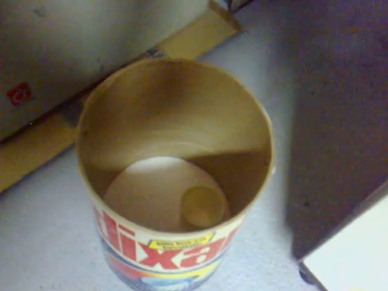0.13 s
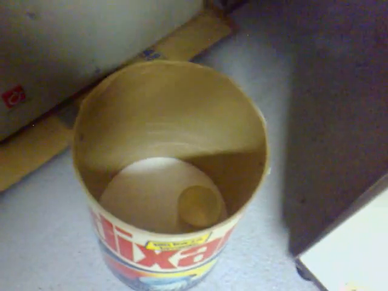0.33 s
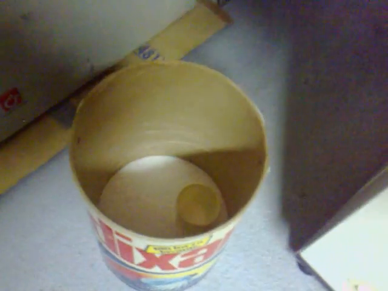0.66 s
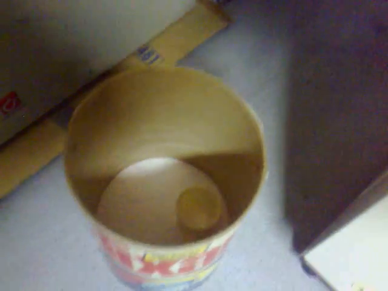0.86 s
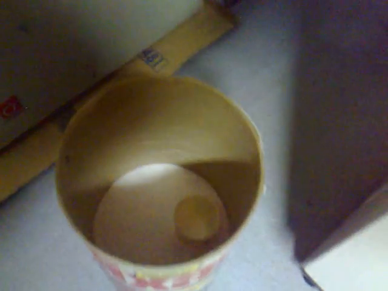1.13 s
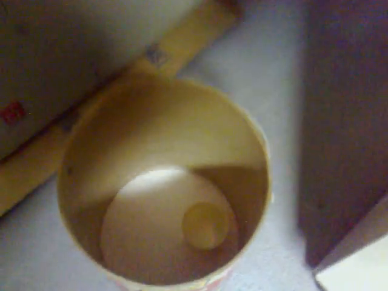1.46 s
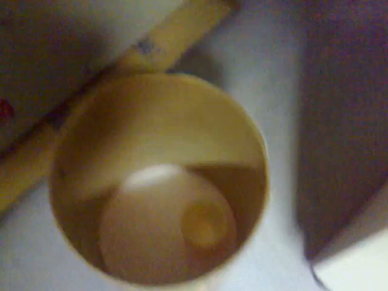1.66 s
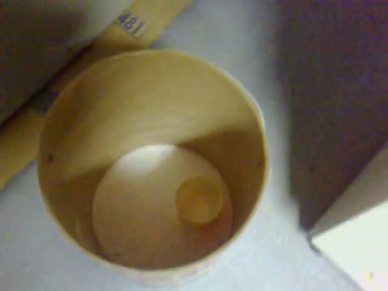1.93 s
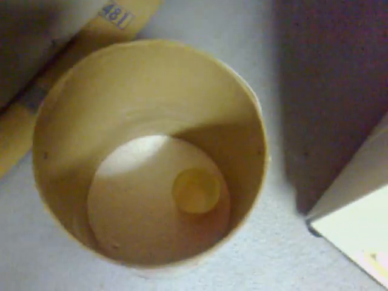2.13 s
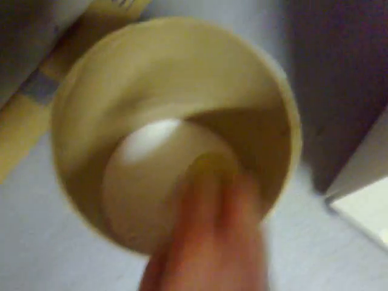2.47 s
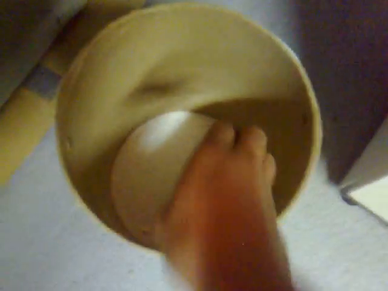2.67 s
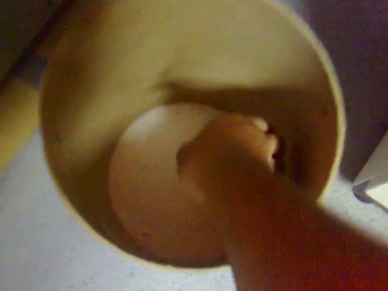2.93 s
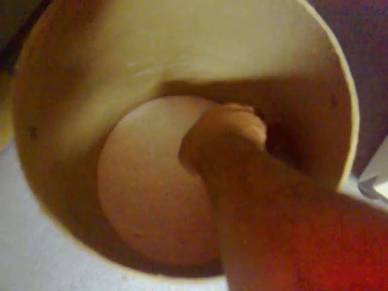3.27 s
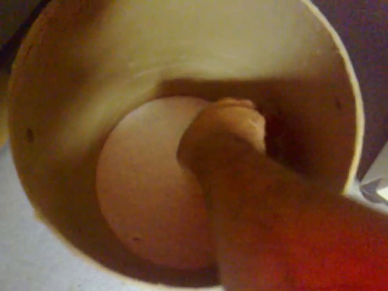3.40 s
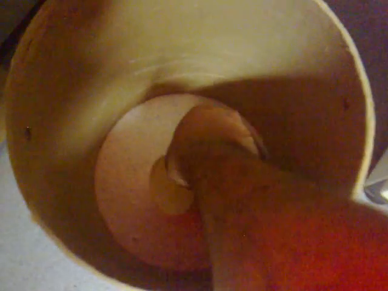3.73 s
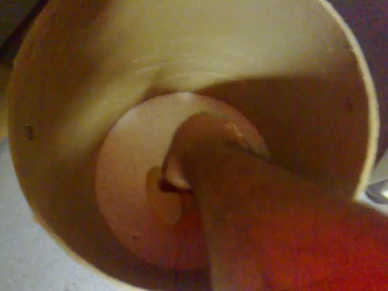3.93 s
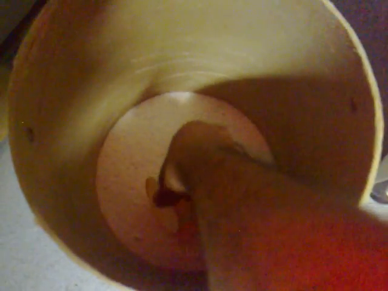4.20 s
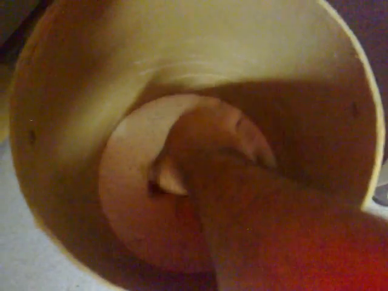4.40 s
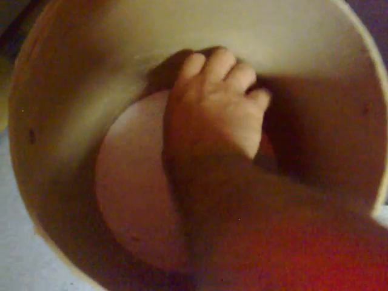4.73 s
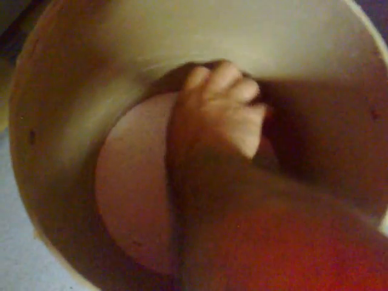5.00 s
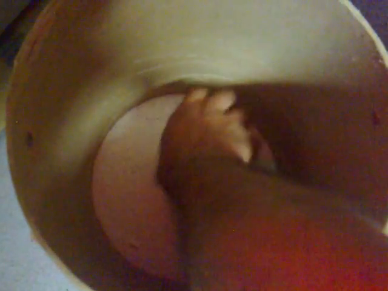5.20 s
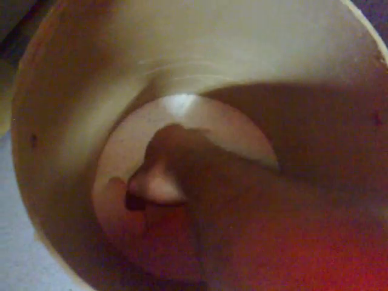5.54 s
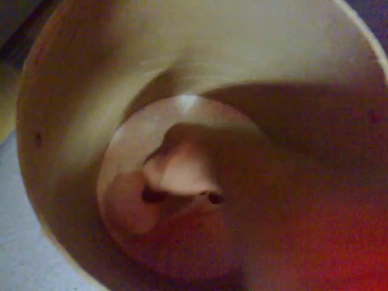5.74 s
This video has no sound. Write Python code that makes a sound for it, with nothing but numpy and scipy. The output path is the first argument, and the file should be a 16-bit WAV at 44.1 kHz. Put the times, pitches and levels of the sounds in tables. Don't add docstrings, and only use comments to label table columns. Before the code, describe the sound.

A cardboard drum's lid pops off, knocks and thuds hollowly, then a hand taps and scrapes a small cup inside, over steady recorder hiss.

```python
import sys
import numpy as np
from scipy import signal
from scipy.fft import rfft, irfft
from scipy.io import wavfile

SR = 44100
rng = np.random.default_rng(int(sys.argv[2]) if len(sys.argv) > 2 else 0)


def digitize_waveform(pressure):
    field = np.atleast_2d(pressure).T
    bounded = np.clip(field, -1, 1)
    quanta = np.round(bounded * 32767).astype(np.int16)
    wavfile.write(sys.argv[1], SR, quanta)


def volts_from_db(level):
    exponent = np.asarray(level, float) / 20
    return 10 ** exponent


N = 258867

# peak_s, rise_s, fall_s, level_db, brightness_db
DRAG_STROKES = [
    (3.444, .08, 0.1, -49.5, 0),
    (3.83, 0.3, 0.21, -60.5, -1.5),
    (3.992, 0.11, 0.23, -58, 1.5),
    (4.165, 0.033, 0.14, -64.5, 11),
    (4.79, 0.028, 0.034, -42, -1),
    (4.9, 0.015, 0.037, -50.5, 0),
    (5.006, 0.017, 0.062, -47, -2.5),
    (5.05, 0.044, 0.013, -45, -1.5),
    (5.31, 0.44, 0.24, -45.5, 0.5),
    (5.49, 0.11, 0.025, -59, -2.5),
]
# peak_s, rise_s, fall_s, level_db, brightness_db
BRUSH_STROKES = [(.11, 0.22, 0.2, -67, -3), (1.27, .03, 0.18, -61, -7), (1.43, 0.014, 0.18, -57, -9.5),
                 (2.23, 0.048, 0.059, -77, -6), (2.6, 0.78, .4, -58, -2), (2.86, 0.15, 0.35, -65, 4.5),
                 (3.04, 0.32, .15, -70, -11), (3.135, .02, 0.13, -52, 0.5), (4.66, 0.21, 0.095, -57.5, 6),
                 (5.822, 0.08, 0.058, -55, 4.5), (5.87, 0.04, .05, -54.5, 1)]


def level(x, db):
    return x * volts_from_db(db) / np.sqrt(np.mean(x ** 2))


def band(x, hz, width_hz):
    return signal.lfilter(*signal.iirpeak(hz, hz / width_hz, fs=SR), x)


def fade(t, t60_s):
    return np.exp(-np.log(1000) * t / t60_s)


def thin(x, low_hz):
    return signal.sosfilt(signal.butter(2, low_hz, "high", fs=SR, output="sos"), x)


def knocks(events, modes, rattle_firm_ms):
    # centre_hz, width_hz, gain_db
    crack_bands = [(750, 510, 26.5), (1500, 1200, 24), (2400, 860, 11), (4760, 800, -5), (10800, 11000, 7)]
    out = np.zeros(N + SR)
    t = np.arange(SR // 2) / SR
    hz, db, t60_s = np.transpose(modes)[:, :, None]
    t60_s = np.minimum(t60_s, 0.1)
    signs = (-1) ** np.arange(len(modes))[:, None]
    spot_gain_db, spot_octaves = 7, 0.23
    scatter_db, split = 1.5, 0.04

    for start_s, peak_db, contact_ms, crack_db, spot_hz in events:
        chance = rng.standard_normal((len(modes), 1))
        grit = rng.standard_normal(4096)
        t_grit = t[:grit.size]

        spot_db = spot_gain_db * np.exp(-(np.log2(hz / spot_hz) / spot_octaves) ** 2)
        strength = signs * volts_from_db(db + spot_db + scatter_db * chance)
        lower = np.sin(2 * np.pi * hz * (1 - split * chance / 2) * t)
        upper = np.sin(2 * np.pi * hz * (1 + split * chance) * t)
        ring = np.sum(strength * fade(t, t60_s) * (lower + 0.41 * upper), axis=0)

        rattle_ms = rattle_firm_ms * 2 ** (-peak_db / 11.5)
        decay = np.exp(-1000 * t_grit / max(rattle_ms, 0.2))
        contacts = decay * grit * 0.062
        contacts[0] = 1
        stroke = 1000 * t[:512] / max(contact_ms, 0.01)
        force = np.convolve(contacts, stroke * np.exp(-stroke))
        hit = signal.fftconvolve(ring, force)[:t.size]

        tearing = grit * (fade(t_grit, 0.035) + 0.61 * decay ** 0.25)
        crack = sum(volts_from_db(gain_db) * band(tearing, f, width) for f, width, gain_db in crack_bands)
        hit /= np.abs(hit).max()
        hit[:grit.size] += volts_from_db(crack_db) * crack / np.abs(crack).max()
        i = int(start_s * SR)
        out[i:i + t.size] += volts_from_db(peak_db) * hit
    return out[:N]


def lid_knocks():
    # start_s, peak_db, contact_ms, crack_db, favoured_hz
    prises = [
        (.606, -39, 0.064, 7, 1000),
        (.611, -47, 0.031, 2, 1580),
        (.7335, -13.5, 0.067, -10, 1500),
        (.745, -27.5, 0.035, -5, 600),
        (.780, -23.5, 0.71, -22, 260),
        (.811, -56, 0.25, 23, 1800),
        (.816, -28.5, .06, -20, 1750),
        (.826, -33.5, 0.18, 3, 2400),
        (.838, -27.5, 0.44, -2, 240),
    ]
    # start_s, peak_db, contact_ms, crack_db, favoured_hz
    drops = [
        (1.1605, -9, 0.24, -23, 570),
        (1.169, -19.5, .35, -4, 190),
        (1.1755, -27, 0.59, -19, 204),
        (1.1865, -12, 0.15, -17.5, 525),
        (1.198, -17, 0.49, -17, 210),
        (1.232, -30, 0.084, -9, 1100),
        (1.262, -33, .25, -9, 400),
        (1.335, -46, 0.53, 6, 200),
        (1.354, -24, 1, -25, 205),
        (1.425, -29, 0.87, -14, 420),
    ]
    # pitch_hz, level_db, t60_s
    rim_modes = [(210, -2, 0.065), (300, -13.5, 0.094), (420, 3.5, 0.026), (590, 4.5, 0.032),
                 (670, 4, 0.029), (760, 7.5, 0.028), (832, 0, 0.039), (1070, -2, 0.014),
                 (1310, -2.5, 0.038), (1535, -0.5, 0.033), (1750, 9, 0.014), (2080, 0, 0.032),
                 (2160, 1, .04), (2480, 7.5, 0.019), (2660, -25, .04), (3200, -24, .03), (5200, -24, .03)]
    # pitch_hz, level_db, t60_s
    lid_modes = [(108.5, -35, 0.14), (150, -32, 0.07), (175.5, -7, 0.12), (200, 0.5, 0.071),
                 (272, -6.5, 0.15), (350, -1, 0.041), (438, -4, 0.12), (490, -1.5, 0.045),
                 (622, -2.5, 0.11), (735, -3, 0.056), (913, -1, 0.045), (1000, -8, 0.05),
                 (1097, -1.5, 0.055), (1273, -5, 0.066), (1500, -6, 0.038), (1700, -9, .05),
                 (1880, -5, .05), (2130, -3, 0.072), (2600, -7, .04), (3380, -16, .04)]
    return knocks(prises, rim_modes, 0.58) + knocks(drops, lid_modes, 1.96)


def drum_thuds():
    # start_s, peak_db, contact_ms, crack_db, favoured_hz
    thuds = [(1.4895, -9, 0.53, -39, 330), (1.4995, -2, 0.021, -14.5, 415), (1.511, -9, 0.51, -17, 200),
             (1.524, -11, 0.26, -9.5, 420), (1.545, -28, 0.33, -14, 210), (1.5965, -17.5, 0.16, -13, 890),
             (1.620, -14, .89, -16, 300), (1.608, -31, 0.37, -19, 423), (1.637, -18.5, 0.27, -23, 350),
             (1.66, -24.5, 0.88, -10, 210), (1.685, -44, .19, -27, 500), (1.760, -48, .68, -27, 197),
             (1.855, -37, 0.75, -30, 192), (1.920, -48, 0.28, -30, 417), (1.979, -46, 1, -30, 193)]
    # pitch_hz, level_db, t60_s
    drum_modes = [(93, -13, 0.16), (134, -14, .15), (177, -23, 0.082), (198.7, 8.5, 0.14), (220, 6, 0.19),
                  (269, 6, 0.048), (330, -26, 0.062), (390, 4.5, 0.027), (432.4, 9, 0.12), (524, 6.5, 0.3),
                  (645, 2, 0.11), (712, 0, 0.25), (815, -3, 0.11), (907, 2, 0.038), (1016, -1, 0.066),
                  (1193, 5, 0.08), (1303, 8.5, 0.039), (1426, 1.5, 0.046), (1690, 3, 0.058),
                  (1840, 3, 0.032), (2020, 0, 0.032), (2280, -10, .06), (2720, -11.5, .06),
                  (4750, -17, .05)]
    return knocks(thuds, drum_modes, 1.5)


def cup_taps():
    # start_s, peak_db, contact_ms, crack_db, favoured_hz
    taps = [
        (3.425, -48, 0.13, -15, 1150),
        (2.752, -50.5, 0.067, 11, 2500),
        (3.510, -62, .091, 16, 1500),
        (3.651, -30.5, 0.39, -27, 1090),
        (4.735, -50, 0.13, -23, 1100),
        (4.783, -50, .14, -5, 760),
        (5.046, -30.5, 0.04, -17, 1100),
    ]
    # start_s, peak_db, contact_ms, crack_db, favoured_hz
    ticks = [
        (3.552, -42, .02, -17, 4600),
        (3.562, -37, 0.018, -11, 4600),
        (3.604, -39, 0.018, -4, 4770),
        (3.6512, -27.5, .014, -5.5, 5200),
        (3.715, -45, .02, -16, 3750),
        (3.746, -40, .02, -3, 3750),
        (4.7667, -39, .02, -23, 4600),
    ]
    # pitch_hz, level_db, t60_s
    cup_modes = [(550, -2, .06), (740, -10, .06), (870, -14, .03), (1100, 0, .085), (1800, -16, .015),
                 (2500, -16, .02), (3600, -18, .02), (4700, -18, .02)]
    # pitch_hz, level_db, t60_s
    edge_modes = [(3750, -9.5, 0.014), (4600, -2, 0.043), (4640, 2, 0.011), (5700, 5.5, 0.0053),
                  (7100, 2, 0.011)]
    return knocks(taps, cup_modes, 0.062) + knocks(ticks, edge_modes, 1)


def base_raps():
    # start_s, peak_db, contact_ms, crack_db, favoured_hz
    raps = [
        (2.728, -36.5, 0.37, -7, 402),
        (4.6865, -12, 0.088, -6, 870),
        (4.706, -34, 0.18, -3, 750),
    ]
    # pitch_hz, level_db, t60_s
    base_modes = [(210, -19.5, 0.085), (300, -10, 0.031), (440, -20.5, 0.036), (614, 0, 0.0059),
                  (777, 1, 0.027), (862, -1.5, 0.014), (1100, 1.5, 0.023), (1270, -0.5, 0.012),
                  (1800, -15, 0.013), (2400, -27, 0.019), (3680, -4, .012), (4700, -9, 0.012)]
    return knocks(raps, base_modes, 0.28)


def friction(strokes, resonances, layer_db, lean):
    t = np.arange(N) / SR
    gain = np.zeros(N)
    for peak_s, rise_s, fall_s, db, bright_db in strokes:
        away = np.maximum((peak_s - t) / rise_s, (t - peak_s) / fall_s)
        gain += volts_from_db(db + layer_db + lean * bright_db - 20 * away)
    slips_per_s, grain_db = 6000, 1.2
    happens = rng.random(N) < slips_per_s / SR
    slips = happens * volts_from_db(grain_db * rng.exponential(size=N)) * rng.standard_normal(N)
    sound = sum(volts_from_db(db) * band(band(slips, hz, width), hz, 2 * width) for hz, width, db in resonances)
    return gain * level(sound, 0)


def cup_drag():
    # centre_hz, width_hz, gain_db
    hollow = [(710, 204, 3.5), (1090, 510, -6.5), (1750, 57, -3.5), (2400, 440, -3), (417, 480, -2.5)]
    # centre_hz, width_hz, gain_db
    rasp = [(3830, 1300, -4), (4600, 500, -1), (5300, 2200, -0.5)]
    # centre_hz, width_hz, gain_db
    fine = [(6040, 3500, -6), (7420, 1600, -0.5), (9200, 3600, -5.5)]
    hum = friction(DRAG_STROKES, hollow, 0, -1.65)
    return hum + friction(DRAG_STROKES, rasp, -1.5, 0.17) + friction(DRAG_STROKES, fine, 0, 0.33)


def skin_brush():
    # centre_hz, width_hz, gain_db
    palm = [(2207, 150, 7.5), (2500, 630, -5), (1740, 1800, 3.5)]
    # centre_hz, width_hz, gain_db
    skin = [(3010, 2400, 3), (3250, 250, 5), (3470, 520, -2)]
    # centre_hz, width_hz, gain_db
    rub = [(480, 350, -5.5), (655, 270, -17), (1150, 100, -8.5)]
    brush = friction(BRUSH_STROKES, palm, 2, 0)
    return brush + friction(BRUSH_STROKES, skin, 0, 1) + friction(BRUSH_STROKES, rub, 0, -1.2)


def room(x):
    # centre_hz, t60_s, level_db
    tails = [(55.6, 2.2, -28.5), (92, 1.08, -29.5), (182, 0.62, -21), (300, 0.23, -18), (500, 0.29, -19),
             (1000, 0.81, -28.5), (2330, 0.41, -22), (5000, 0.35, -9)]
    t = np.arange(SR) / SR
    swell = 1 - np.exp(-t / 0.00097)
    tail = np.zeros(SR)
    for hz, t60_s, db in tails:
        noise = band(rng.standard_normal(SR), hz, 0.9 * hz)
        tail += level(noise * fade(t, t60_s) * swell, db)
    return signal.fftconvolve(x, tail / np.sqrt(SR))[:N]


def recorder_floor():
    # pitch_hz, density_db
    hiss_spectrum = [(20, 7.5), (60, 9), (250, 8), (500, 1.5), (1000, -0.5), (2500, -5), (5000, -3.5),
                     (7000, -1.5), (10000, 1.5), (13000, 4), (15500, 2.5)]
    # pitch_hz, wander_hz, level_db
    tones = [(94.5, 6.6, -82), (399.5, 12.9, -62.5), (7590, 95, -60.5)]
    hz, db = np.transpose(hiss_spectrum)
    f = np.fft.rfftfreq(N, 1 / SR) + 1
    hiss = irfft(rfft(rng.standard_normal(N)) * volts_from_db(np.interp(np.log(f), np.log(hz), db)), N)
    rumble, hum, high = (whine(*row) for row in tones)
    high = high + whine(15190, 250, -55)
    shade_s, shade_length_s, shade_db = 1.36, 0.4, -1.5
    t = np.arange(N) / SR
    shade = volts_from_db(shade_db * np.exp(-((t - shade_s) / shade_length_s) ** 4))
    return level(hiss, -46.5) + rumble + hum + shade * high


def whine(hz, wander_hz, db):
    drift = np.sqrt(2 * np.pi * wander_hz / SR) * rng.standard_normal(N)
    return level(np.sin(np.cumsum(2 * np.pi * hz / SR + drift)), db)


def stereo_patches():
    count, size = 30, 2048
    low_hz, high_hz, half_width = 4600, 15000, 0.075
    side = np.zeros(N)
    f = np.fft.rfftfreq(size, 1 / SR)
    for place, pitch in rng.random((count, 2)):
        hz = low_hz + pitch * (high_hz - low_hz)
        i = int(place * (N - size))
        patch = irfft(rfft(rng.standard_normal(size)) * (np.abs(f / hz - 1) < half_width))
        side[i:i + size] += level(patch, -56) * hz / high_hz * np.sqrt(np.hanning(size))
    return side * np.array([[1], [-1]])


def scene():
    lid = lid_knocks()
    drum = drum_thuds()
    inside = cup_taps() + base_raps() + cup_drag() + skin_brush()
    lid_echo = volts_from_db(-0.5) * room(thin(lid, 260))
    inside_echo = volts_from_db(-2.5) * room(thin(inside, 570))
    heard = lid + drum + thin(inside, 190) + lid_echo + room(drum) + inside_echo
    heard = thin(heard, 87)
    return heard + recorder_floor() + stereo_patches()


def band_limit(x):
    return signal.sosfilt(signal.butter(12, 17080, fs=SR, output="sos"), x)


def record(dry):
    recovery_s, top_hz = 0.22, 15690
    pole = np.exp(-1 / (recovery_s * SR))
    loud = signal.lfilter([(1 - pole) ** 2], np.convolve([1, -pole], [1, -pole]), np.abs(dry[0]))
    top_cut = signal.ellip(12, 0.2, 70, top_hz, fs=SR, output="sos")
    mix = signal.sosfilt(top_cut, np.tanh(dry)) / (1 + 7.8 * loud)
    return band_limit(mix)


dry = scene()
out = record(dry)
digitize_waveform(out)
```